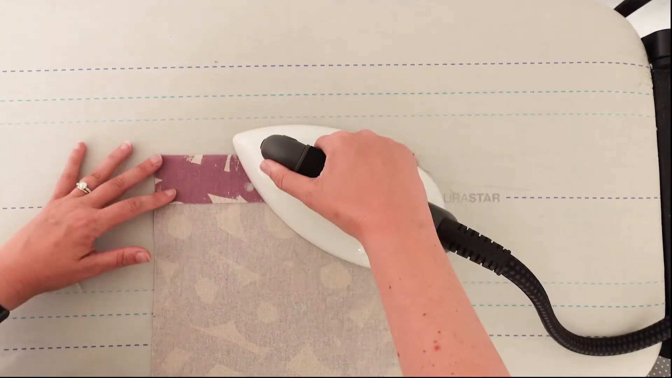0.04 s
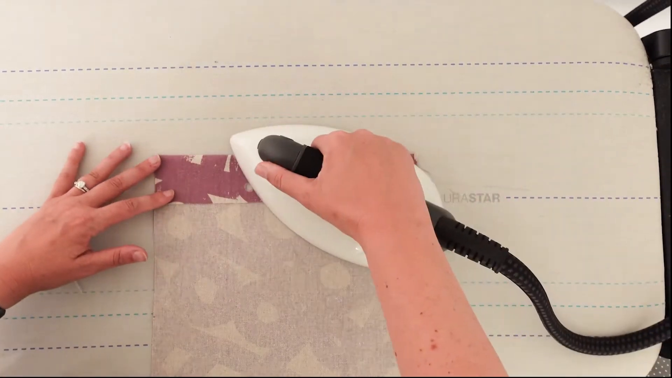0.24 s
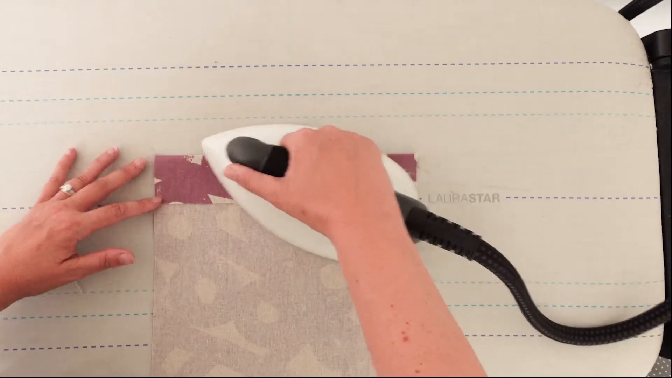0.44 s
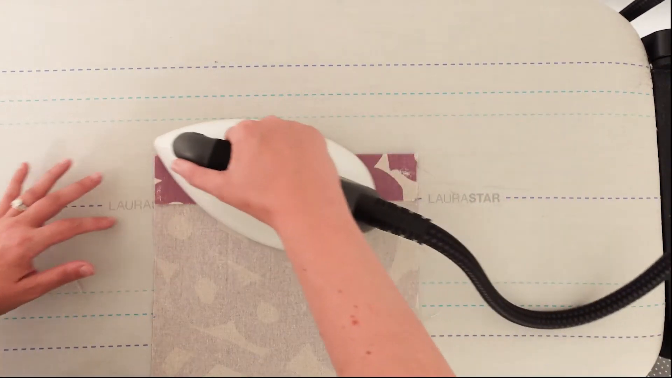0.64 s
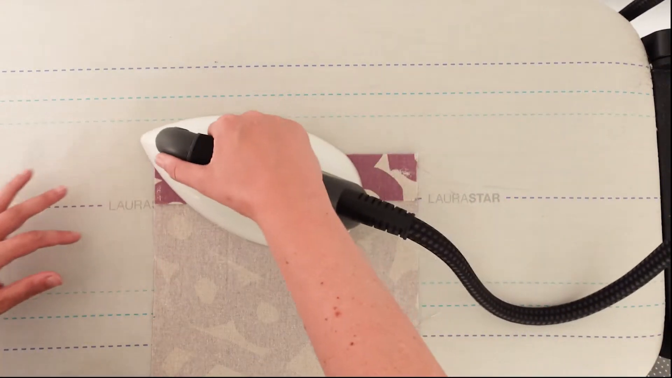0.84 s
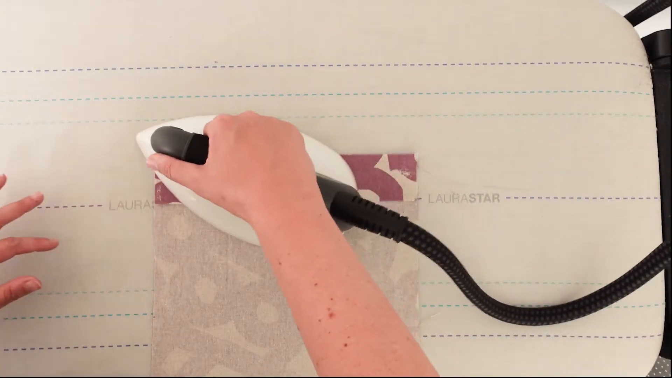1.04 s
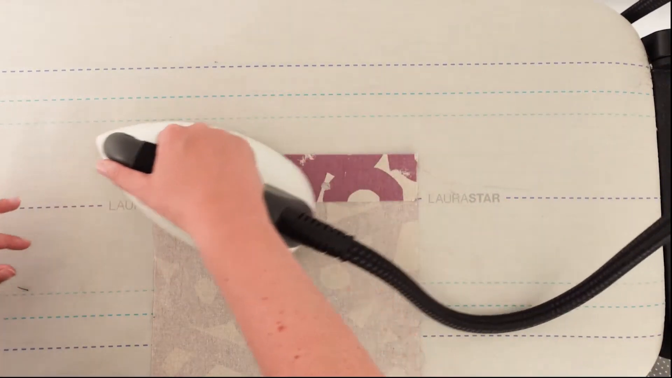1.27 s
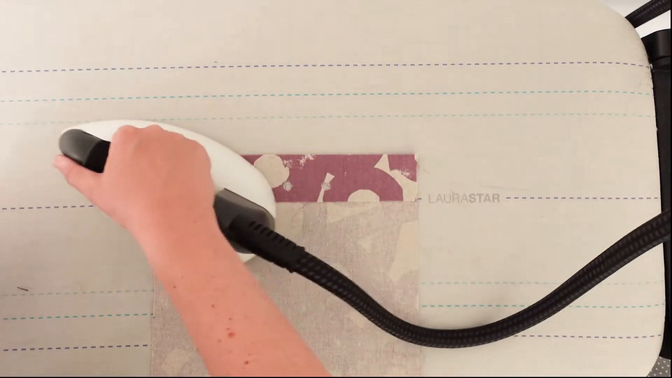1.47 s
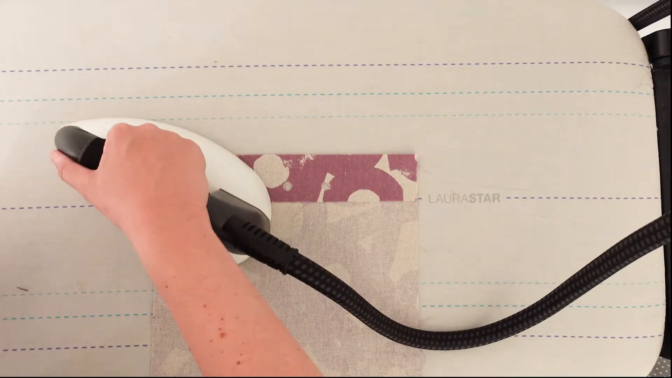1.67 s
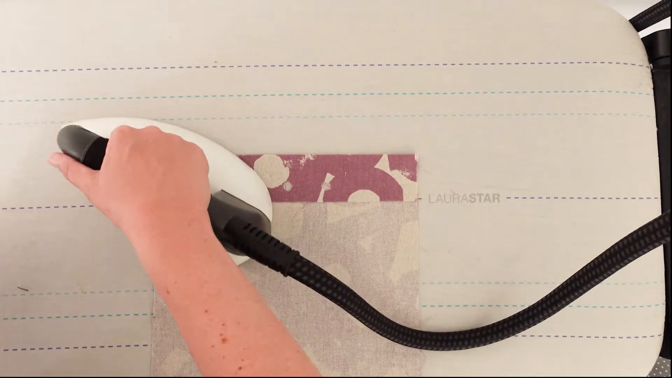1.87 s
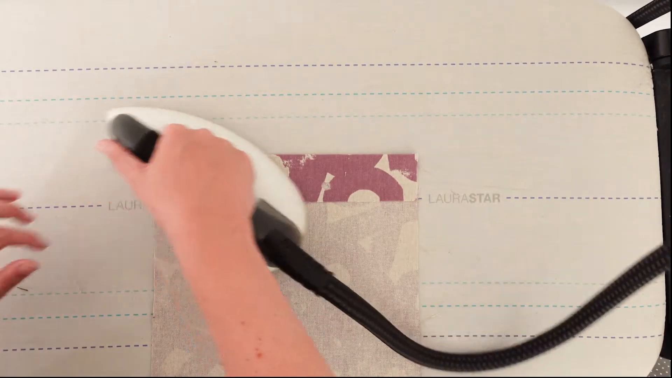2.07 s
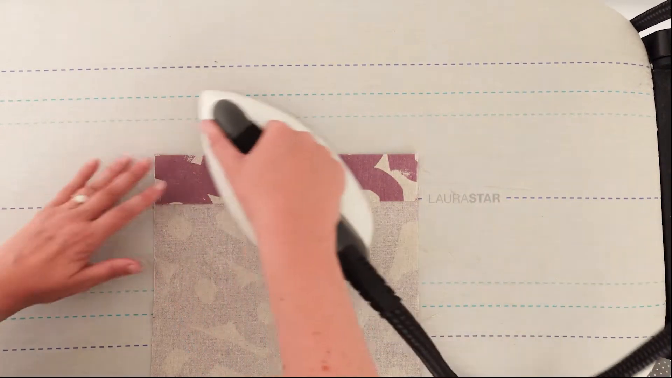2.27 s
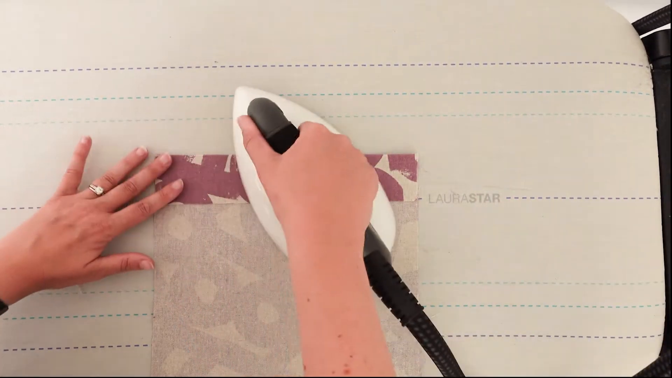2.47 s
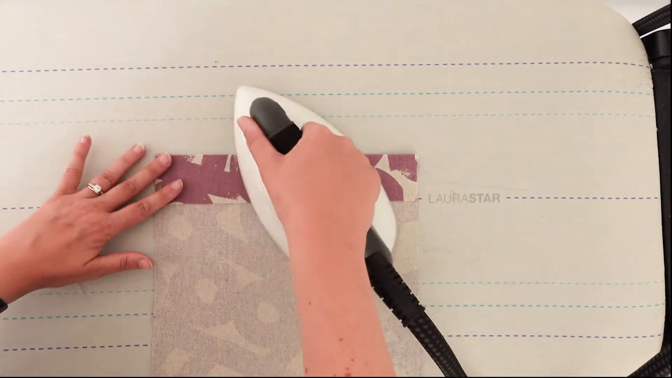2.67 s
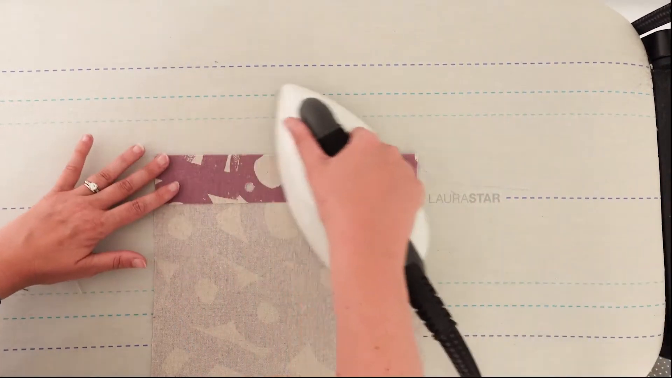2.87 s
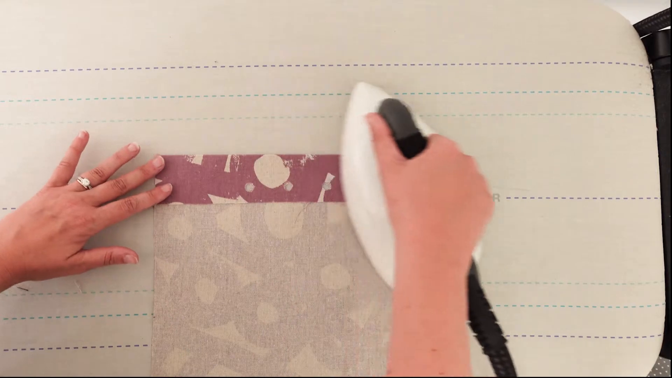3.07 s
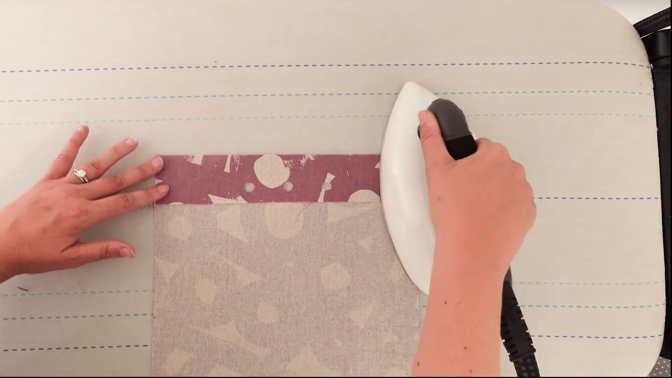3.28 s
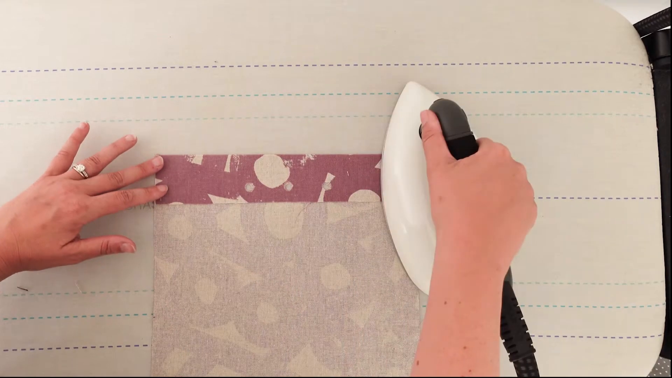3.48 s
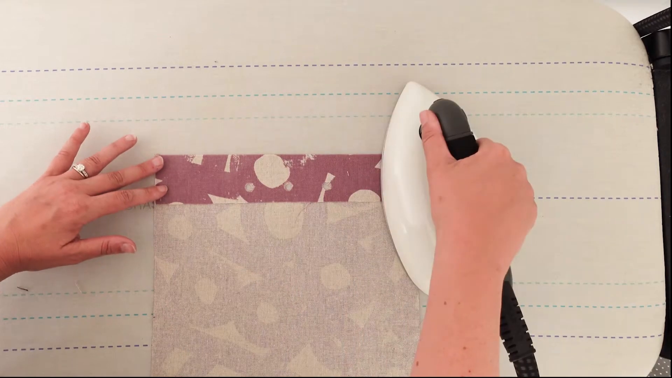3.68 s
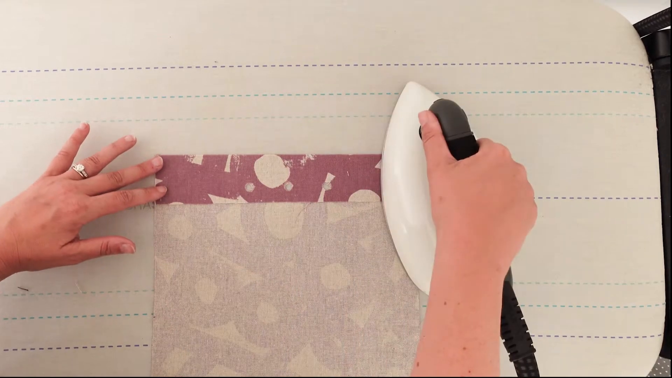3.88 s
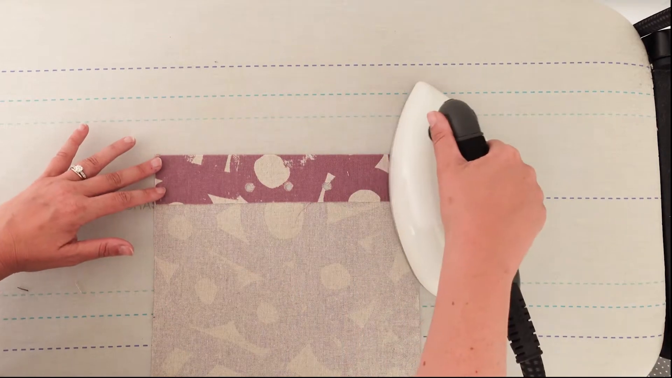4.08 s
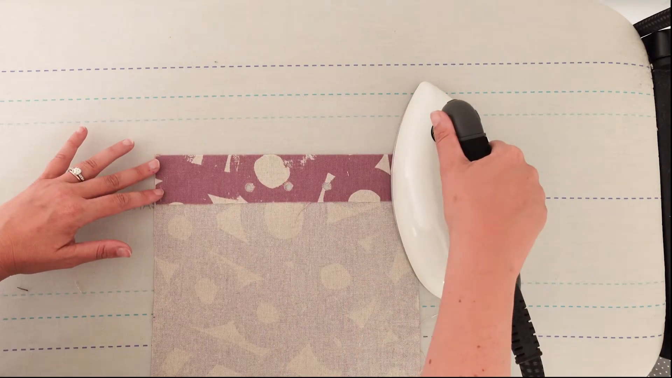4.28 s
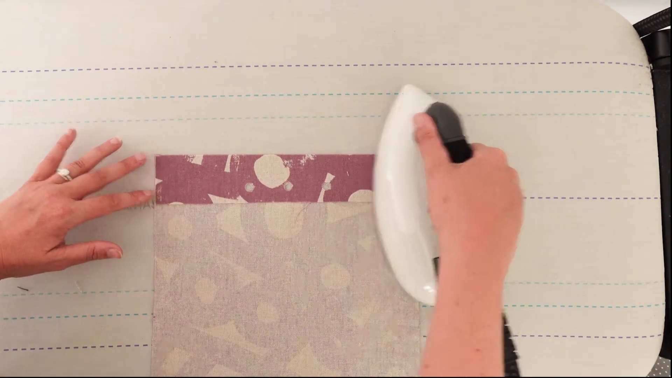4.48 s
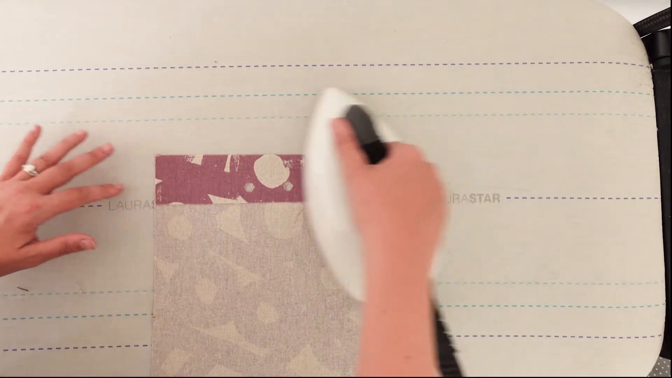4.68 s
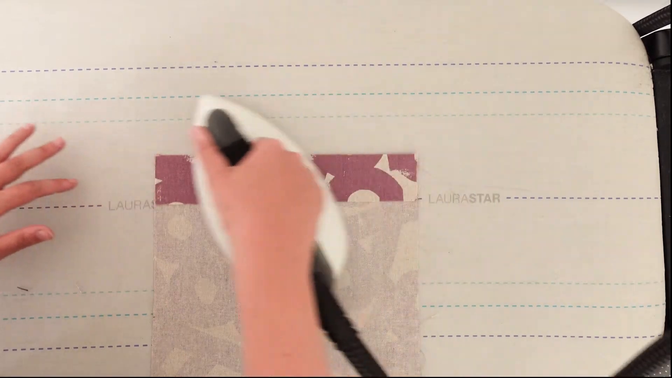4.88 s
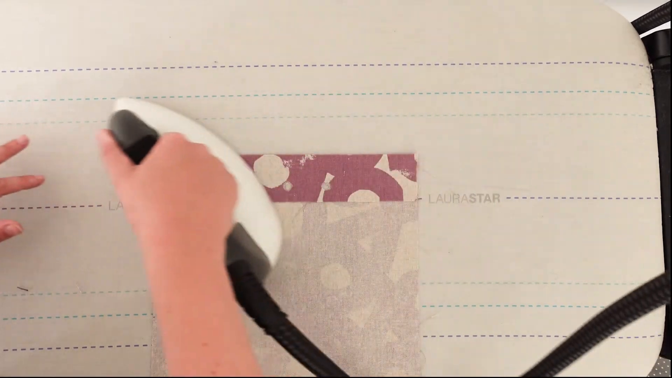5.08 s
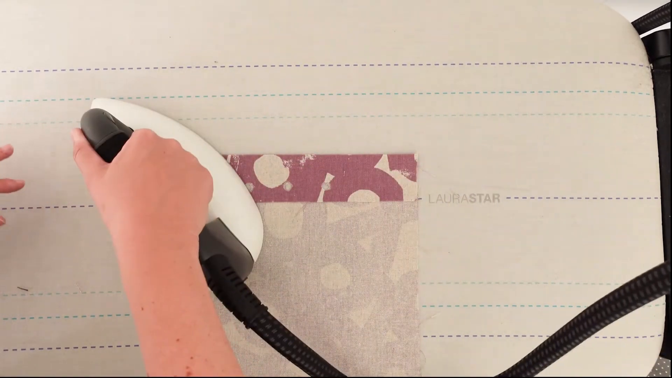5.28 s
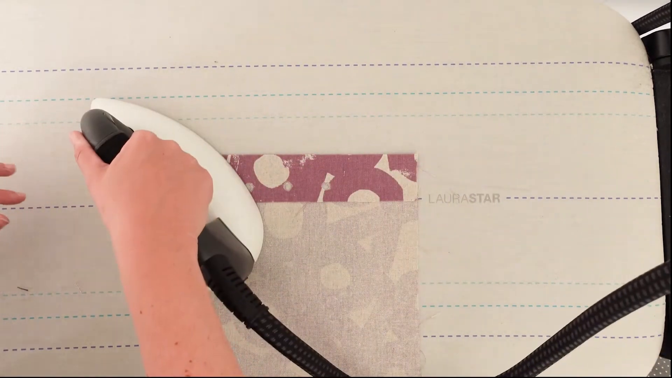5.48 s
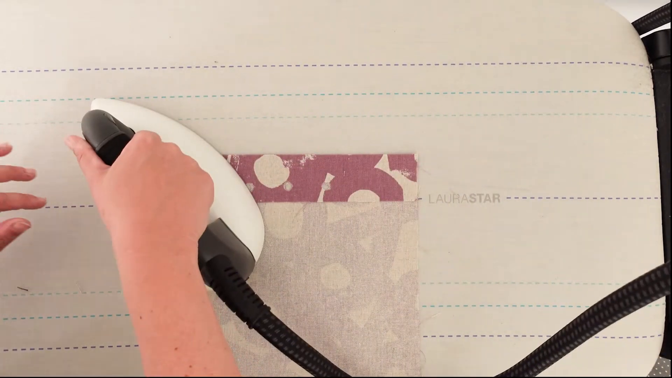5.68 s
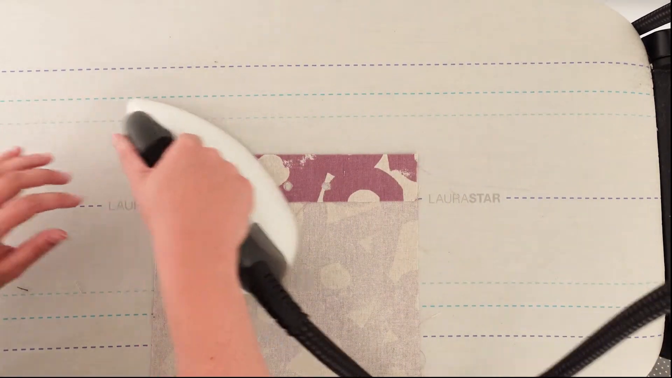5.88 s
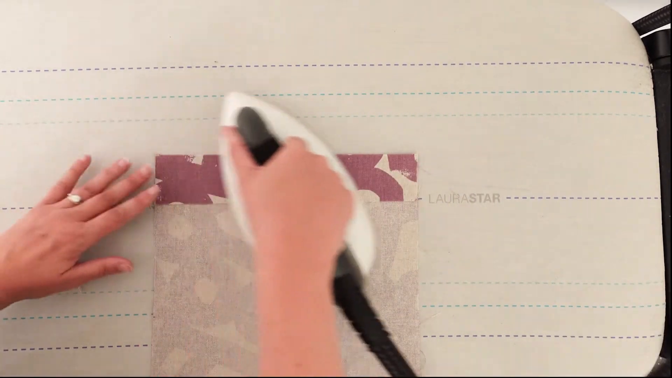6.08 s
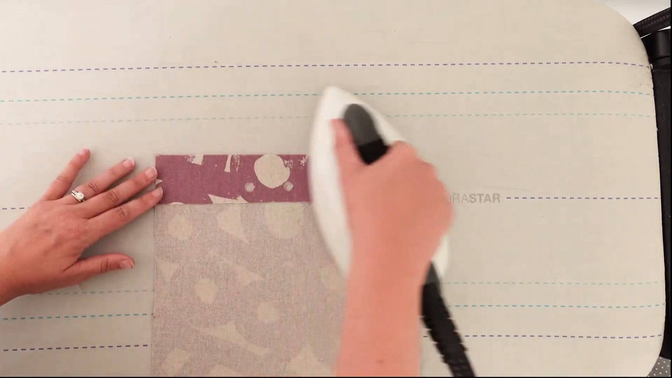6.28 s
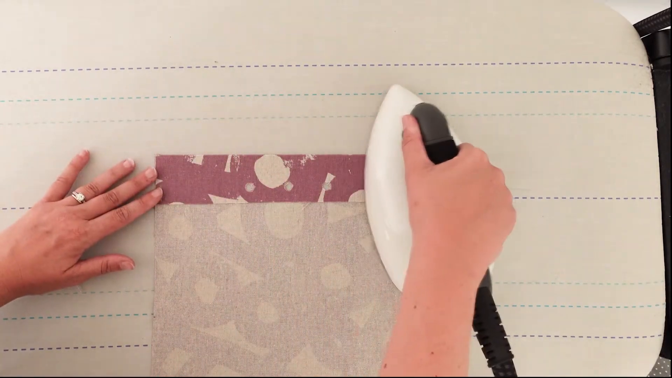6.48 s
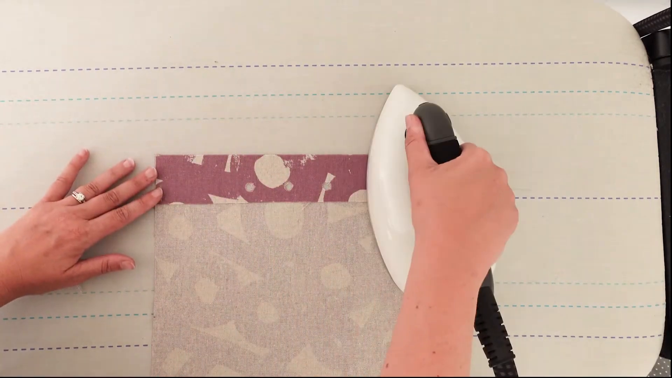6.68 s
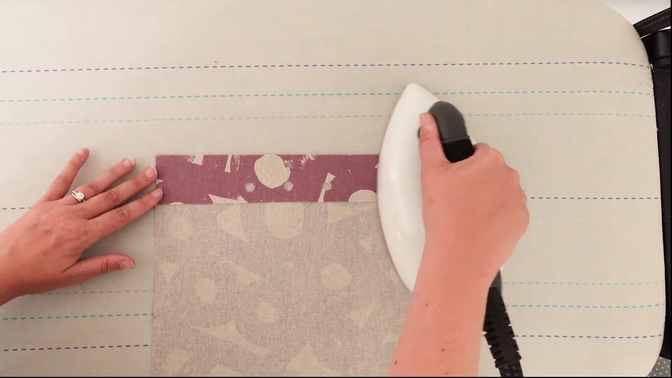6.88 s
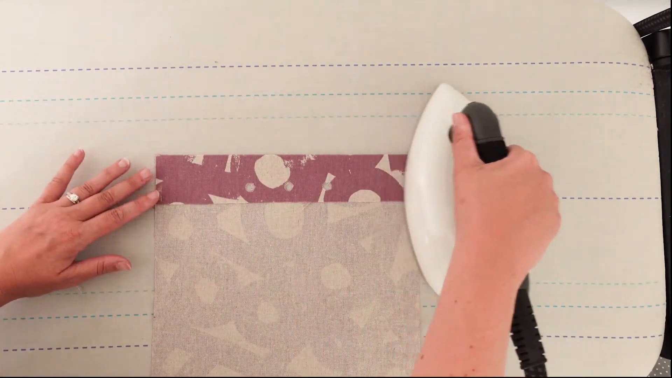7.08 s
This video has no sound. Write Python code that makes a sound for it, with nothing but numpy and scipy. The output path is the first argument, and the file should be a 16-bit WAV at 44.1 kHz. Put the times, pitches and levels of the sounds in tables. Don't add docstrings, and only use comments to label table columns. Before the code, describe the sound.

Close above a padded ironing board in a small quiet room, a steam iron fires seven bursts. A sharp clack starts each strong airy hiss; a soft thud shuts it and the treble fades first. The first is short with knocking water in the hose, the fifth is longer, the last stays open. A low unsteady fan hums beneath, with faint ticks and bumps.

```python
import sys
import numpy as np
from scipy import signal
from scipy.fft import rfft, irfft
from scipy.io import wavfile
from scipy.ndimage import uniform_filter1d

SR = 44100
rng = np.random.default_rng(int(sys.argv[2]) if len(sys.argv) > 2 else 0)


def attenuation_scalar(level_db):
    decades = np.asarray(level_db, float) / 20
    return 10 ** decades


def master(y):
    cut = np.clip(np.atleast_2d(y).T, -1, 1)
    pcm = np.round(cut * 32767)
    wavfile.write(sys.argv[1], SR, pcm.astype(np.int16))


N = 314874
T = np.arange(N) / SR
F = np.maximum(np.arange(N // 2 + 1) * SR / N, 1)


def unit(x):
    return x / np.sqrt(np.mean(x ** 2))


def shape(points):
    hz, db = np.transpose(points)
    return attenuation_scalar(np.interp(np.log(F), np.log(hz), db))


def peak(hz, width):
    return 1 / (1 + 1j * (F / hz - hz / F) * hz / width)


def noise(gain):
    return unit(irfft(rfft(rng.standard_normal(N)) * gain, N))


def walk(rate):
    hold = int(SR / rate)
    steps = np.repeat(rng.standard_normal(N // hold + 1), hold)
    return unit(uniform_filter1d(uniform_filter1d(steps, hold), hold)[:N])


def ring(modes, push_s):
    t = T[:SR // 3]
    y = sum(attenuation_scalar(db) * np.sin(2 * np.pi * hz * t) * 1000 ** (-t / t60) for hz, db, t60 in modes)
    y = np.convolve(y, np.hanning(int(push_s * SR) + 3))[:len(t)]
    return y / np.abs(y).max()


def swell(sound, rise_s):
    return sound * np.sin(np.pi / 2 * np.clip(T[:len(sound)] / rise_s, 0, 1)) ** 2


def add(out, s, sound):
    i = int(s * SR)
    out[i:i + len(sound)] += sound[:N - i]


def nearby(t60, db):
    t = T[:SR // 20]
    echoes = rng.standard_normal(len(t)) * 1000 ** (-t / t60)
    return 1 + attenuation_scalar(db) * rfft(echoes / np.sqrt(np.sum(echoes ** 2)), N)


def room(x, t60, wet_db):
    t = T[:SR // 2]
    diffuse = signal.lfilter([1], [1, -.6], rng.standard_normal(len(t)))
    tail = diffuse * 1000 ** (-t / t60) * np.clip(t / .015 - .3, 0, 1)
    return x + attenuation_scalar(wet_db) * signal.fftconvolve(x, tail / np.sqrt(np.sum(tail ** 2)))[:N]


# pitch_hz, level_db per Hz
ROOM_TONE = [(22, -21.5), (75, -13), (200, -16), (420, -12.5), (1200, -21.5), (2500, -30.5), (9000, -40.5),
             (15500, -50)]
# start_s, level_db
ROOM_TONE_DB = [(0, -55.5), (.7, -57.5), (1.6, -59), (2.45, -59), (3.3, -58.5), (4.7, -58), (5.2, -59),
                (6.3, -56), (7.14, -60.5)]


def room_tone():
    level_db = np.interp(T, *np.transpose(ROOM_TONE_DB)) + 0.27 * walk(3)
    return attenuation_scalar(level_db) * noise(shape(ROOM_TONE))


# start_s, level_db
FAN = [(0.0, -51), (0.42, -49), (0.44, -43), (0.63, -69), (0.67, -46.5), (1.45, -51), (1.49, -53),
       (1.55, -68), (1.63, -47), (1.73, -50.5), (1.95, -48.5), (3.82, -55.5), (3.92, -44), (4.12, -59.5),
       (4.26, -47), (4.41, -57), (7.1, -56), (7.14, -51)]
# pitch_hz, width_hz
FAN_BANDS = [(136.2, 29.4), (110.4, 15), (289.2, 32), (428.6, 120)]


def fan():
    suction = np.interp(T, *np.transpose(FAN))
    linger_s = 0.24
    steamy = sum((T > start) * 1. for start, *_ in OPENS)
    steamy = steamy - sum((T > shut + linger_s) * 1. for shut, *_ in SHUTS)
    steamy = uniform_filter1d(steamy, size=SR // 6)
    drum, low, duct, throat = (noise(peak(*band) ** 2) for band in FAN_BANDS)
    board = attenuation_scalar(suction - 1.2 * walk(12)) * (drum + attenuation_scalar(-6.5) * low)
    mean_suction = uniform_filter1d(suction, size=SR)
    duct_db = -53 + 0.86 * (mean_suction + 51.5) + 2.5 * steamy + 1.5 * walk(6.7)
    return board + attenuation_scalar(duct_db) * (throat + attenuation_scalar(-9.5) * duct)


# start_s, snap_db (trigger), housing_db, plunger_db
OPENS = [(0.0095, -23, -29.5, -21), (0.82, -17.5, -29, -20.5), (1.678, -24.5, -28.5, -22),
         (2.5371, -29, -28, -21), (3.395, -30, -32, -18.5), (5.2624, -14.5, -30, -18.5),
         (6.5204, -25.5, -32, -18.5)]
# pitch_hz, level_db, t60_s
SNAP = [(680, 0, .007), (735, -8, .045), (960, -13, .035), (340, -8, .03)]
KNOCK = [(312.7, -1, 0.05), (740, -9, .04)]
HOUSING = [(416.3, -2, 0.15), (447, -4.5, 0.12)]
PLUNGER = [(1564, 1, 0.062), (1720, -6, 0.076), (1277, -5, 0.087), (1550, 9, 0.023)]


def valve_opens():
    out = np.zeros(N)
    for s, snap_db, housing_db, plunger_db in OPENS:
        add(out, s + .0002, -attenuation_scalar(snap_db) * ring(SNAP, .0008))
        add(out, s - .001, -attenuation_scalar(housing_db) * ring(KNOCK, 0.00089))
        add(out, s, attenuation_scalar(housing_db + 5.5) * swell(ring(HOUSING, 0.00047), 0.013))
        add(out, s, attenuation_scalar(plunger_db) * swell(ring(PLUNGER, 0.00022), 0.0081))
    return out


def burst_clocks():
    shuts = [s for s, *_ in SHUTS] + [T[-1]]
    for (start, *_), shut in zip(OPENS, shuts):
        yield np.clip(T - start + 0.0031, 0, None), np.clip(T - shut, 0, None)


# lag_s (steam arrives), top_db, fill_s, drain_s (to fall 30 dB), bend (of the drain)
BURSTS = [(.2, -24.5, 0.069, 0.17, 1.8), (0.083, -22, 0.11, 0.4, 2.66), (0.031, -22, 0.11, 0.39, 2.08),
          (0.016, -22, .13, 0.4147, 1.74), (0.018, -25, 0.1, 0.4819, 1.88),
          (0.005, -23.5, 0.12, 0.38, 1.36), (0.005, -25.5, 0.11, .45, 1.6)]


def valve_hiss():
    edge = attenuation_scalar(-9) * abs(peak(14300, 1500)) ** 2
    hiss = noise((abs(peak(9400, 8500)) ** 2 + edge) * nearby(.015, -7))
    out = np.zeros(N)
    for (_, _, _, drain_s, _), (opened, closed) in zip(BURSTS, burst_clocks()):
        onset = np.clip(opened / .003, 0, 1) * (1 + attenuation_scalar(2.5) * np.exp(-opened / 0.0029))
        seep = attenuation_scalar(-15) * np.exp(-(closed / drain_s / (1 - 0.12)) ** 4)
        out += attenuation_scalar(-44) * hiss * onset * (np.exp(-closed / .03) + seep)
    return out


def flow_db(since_open, since_shut, lag_s, top_db, fill_s, drain_s, bend):
    filling = np.clip(since_open - since_shut - lag_s, 0, None)
    return top_db - 17 * np.exp(-filling / fill_s), -30 * (since_shut / drain_s) ** bend


POCKETS = {"middle": [(740, 76, 1), (1000, 110, 2), (1280, 62, -11), (1620, 60, 4.5), (3570, 350, -6.5),
           (4330, 590, -6), (5600, 450, -6.5), (7110, 1700, -7)], "left": [(770, 80, 2), (930, 88, 11),
           (1637, 84, 4), (1910, 250, 2.5), (2780, 340, 1), (5860, 500, -12.5), (7000, 1000, -2)],
           "right": [(830, 100, -4), (1480, 200, -1.5), (2240, 180, 3.5), (2850, 200, -7.5),
           (3442, 680, -3), (4300, 400, -6.5), (8700, 600, -13)]}
# pitch_hz, level_db per Hz
JET = [(300, -30.5), (560, -19), (850, -4), (1630, -5), (2440, -7.5), (7000, 1), (10500, 7.5),
       (16500, -5.5)]
# place (on the cloth), bass_db, treble_db, deep_db (deep pocket),
# ring_db (other pockets), darken_db (per band and drain time)
PLACES = [("middle", -1.3, -0.87, 28, -0.94, 0.1), ("middle", -1, 0.76, 20, 1.5, 1),
          ("left", 0.55, -0.67, 19, -2, 0.79), ("middle", -1, -1.2, 16, -3.5, -3),
          ("right", -3, 4, 0, 0.1, -0.65), ("left", 1.5, -1.7, 15.6, 0.094, 0.1),
          ("right", -2.5, 3.5, -28, 0.1, 0.033)]
JET_BANDS_HZ = [900, 2200, 5300, 10000, 14500]
# level_db (at full flow), rising (dB per dB of filling), falling (dB per dB of draining),
# fade_db (extra loss per drain time), puff_db (first puff)
JET_LAW = [(-12, 1.25, 0.72, 1, -47), (-7, 0.81, 0.7, -1.8, -45), (-2.03, 1.02, 0.98, 2.5, -52.5),
           (-3.5, 2.15, 1.37, 11, -42.5), (-3, 3.5, 1.2, 17.5, -59)]
JET_RISE_S = [.05, .015, .004, .003, .003]


def steam_jets():
    out = np.zeros(N)
    full_flow_db = -24
    white, jet = rfft(rng.standard_normal(N)), shape(JET)
    flutter = 0.25 * walk(19) + .5 * walk(45)
    flicker = [flutter + 0.47 * walk(28) for _ in JET_LAW]
    for row, (opened, closed), spot in zip(BURSTS, burst_clocks(), PLACES):
        lag_s, drain_s = row[0], row[3]
        place, bass_db, treble_db, deep_db, ring_db, darken_db = spot
        pockets = attenuation_scalar(deep_db) * abs(peak(605, 330)) ** 2
        for hz, width, db in POCKETS[place]:
            pockets += attenuation_scalar(db + ring_db) * abs(peak(hz, width)) ** 2
        colour = white * jet * nearby(0.051, -14) * (1 + pockets)
        fill, drain = flow_db(opened, closed, *row)
        stall = np.exp(-np.clip(closed - 1.134 * drain_s, 0, None) / 0.053)
        arrived = np.clip((opened - lag_s) / 0.02, 0, 1) * stall
        tone_db = [bass_db, bass_db, 0, treble_db, treble_db]
        for k, (db, rising, falling, fade_db, puff_db) in enumerate(JET_LAW):
            crossfade = np.interp(np.log(F), np.log(JET_BANDS_HZ), np.eye(len(JET_LAW))[k])
            band = unit(irfft(colour * crossfade, N))
            jet_db = full_flow_db + db + rising * (fill - full_flow_db) + falling * drain
            jet_db = jet_db - (fade_db + (k - 2) * darken_db) * closed / drain_s + tone_db[k]
            puff = attenuation_scalar(puff_db + 28 * lag_s - 145 * opened)
            build = np.clip(opened / JET_RISE_S[k], 0, 1) ** 2
            out += build * band * np.hypot(arrived * attenuation_scalar(jet_db), puff) * attenuation_scalar(flicker[k])
    return out


# start_s, level_db
RATTLES = [(.143, -29), (.156, -27.5), (.184, -26), (.196, -34), (.204, -24)]
# pitch_hz, level_db, t60_s
HOSE = [(740, 0.5, 0.041), (1230, -0.5, 0.039), (980, -12, 0.022), (1630, -5, 0.021)]


def hose_rattles():
    out = np.zeros(N)
    for s, db in RATTLES:
        modes = [(hz * rng.uniform(0.943, 1.04), g, t60) for hz, g, t60 in HOSE]
        add(out, s, attenuation_scalar(db) * swell(ring(modes, 0.00057), 0.0016))
    return out


# start_s, thud_db, housing_db
SHUTS = [(0.27, -26, -32), (1.075, -25.5, -31), (1.887, -21.5, -34.5), (2.746, -24, -35.5),
         (3.951, -25, -40.5), (5.619, -26, -36.5)]
# pitch_hz, level_db, t60_s
THUD = [(289, -5.5, 0.11), (330, 3, 0.045)]


def valve_shuts():
    out = np.zeros(N)
    for s, thud_db, housing_db in SHUTS:
        add(out, s, attenuation_scalar(thud_db) * ring(THUD, .0022))
        add(out, s, attenuation_scalar(housing_db + 10.5) * swell(ring(HOUSING, 0.0025), 0.02))
    return out


# start_s, level_db
BUMPS = [(0.426, -33), (0.683, -42), (0.747, -40), (1.479, -37), (2.385, -42), (5.149, -45.5)]


def board_bumps():
    out = np.zeros(N)
    for start, db in BUMPS:
        add(out, start - .008, attenuation_scalar(db + 4) * swell(ring([(140, 0, .13)], .003), .018))
    return out


# start_s, level_db
SPITS = [(.527, -60), (.716, -61), (.752, -61), (.78, -80), (1.51, -66), (1.535, -65), (1.56, -67),
         (1.605, -69), (1.652, -70), (2.41, -69), (2.47, -74.5), (3.33, -66), (3.347, -75), (5.186, -73)]


def drop_spits():
    out = np.zeros(N)
    for s, db in SPITS:
        hiss = rng.standard_normal(200)
        add(out, s, attenuation_scalar(db) * (hiss[3:] - hiss[:-3]) * np.exp(-T[:197] / .001))
    return out


# start_s, level_db, pitch_hz
CREAKS = [(.757, -51, 1000), (1.308, -38, 900), (4.766, -44.5, 1040), (4.841, -46, 800),
          (4.852, -47.5, 950), (5.186, -50.5, 1000), (6.33, -43, 1010), (6.345, -50, 1020)]


def board_creaks():
    out = np.zeros(N)
    for s, db, hz in CREAKS:
        add(out, s, attenuation_scalar(db + 6) * ring([(hz * k, 0, .02) for k in (.6, .8, 1.05, 1.3)], .0003))
    return out


def scene():
    parts = valve_opens() + hose_rattles() + valve_shuts() + drop_spits() + board_creaks()
    parts = signal.sosfiltfilt(signal.butter(2, 220, "high", fs=SR, output="sos"), parts)
    steam = valve_hiss() + steam_jets()
    mono = room(steam, 0.35, -16) + room(parts, 0.18, -10.0) + fan() + board_bumps() + room_tone()
    return np.array([mono, mono])


# start_s, low_hz, high_hz, level_db
FILLS = [(2.815, 4220, 5130, -34.5), (2.815, 13500, 15300, -42), (3.65, 7460, 8940, -31),
         (3.885, 6900, 9100, -29), (3.885, 13400, 15500, -34), (4.09, 4400, 6550, -31.5),
         (4.09, 10800, 12500, -36), (5.415, 4160, 5200, -40.5), (5.415, 10800, 12500, -46),
         (6.81, 10200, 12500, -33.5), (6.97, 5530, 7000, -30.5), (6.97, 10800, 12500, -31),
         (6.97, 12900, 14800, -33), (7.02, 4000, 5100, -35)]


def side_noise():
    side = np.zeros(N)
    grid, first = 1024, 236
    for s, lo_hz, hi_hz, db in FILLS:
        centre = (np.round((s * SR - first) / grid) * grid + first) / SR
        fade = np.cos(np.pi / 2 * np.clip((T - centre) / 0.02, -1, 1)) ** 2
        side += attenuation_scalar(db) * noise((F > lo_hz) & (F < hi_hz)) * fade
    return side


def band_limit(x):
    return signal.sosfilt(signal.butter(12, 16780, fs=SR, output="sos"), x)


def record(dry):
    both = dry + side_noise() * np.array([[1], [-1]])
    cutoff = signal.ellip(12, .3, 70, 15700, fs=SR, output="sos")
    return band_limit(signal.sosfilt(cutoff, both))


dry = scene()
out = record(dry)
master(out)
```